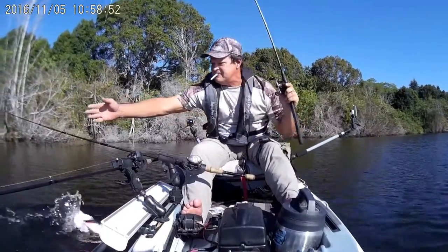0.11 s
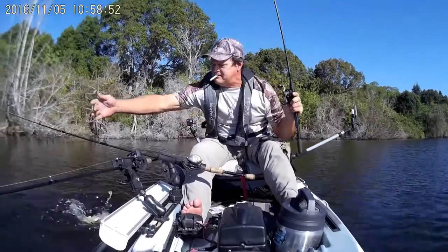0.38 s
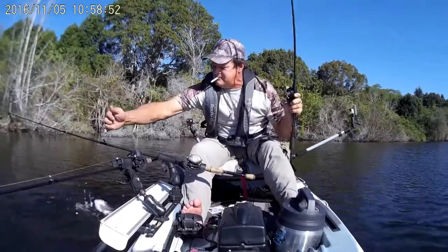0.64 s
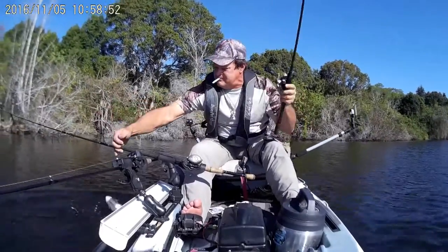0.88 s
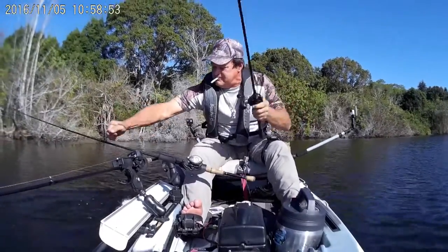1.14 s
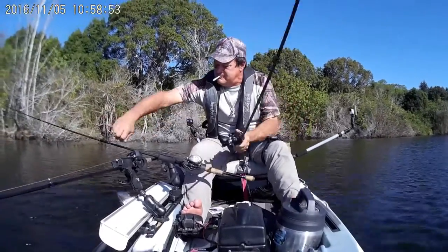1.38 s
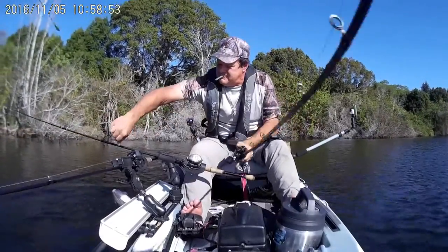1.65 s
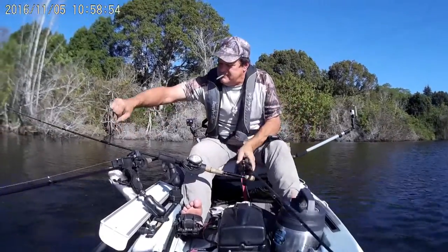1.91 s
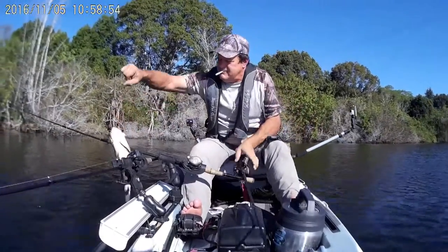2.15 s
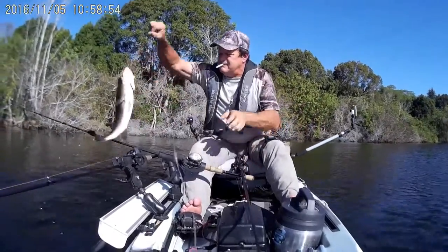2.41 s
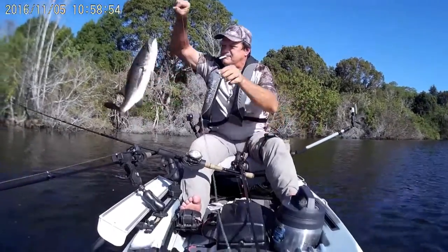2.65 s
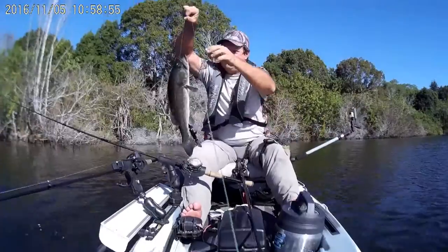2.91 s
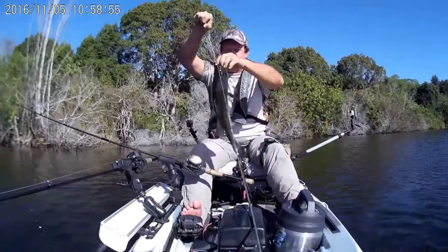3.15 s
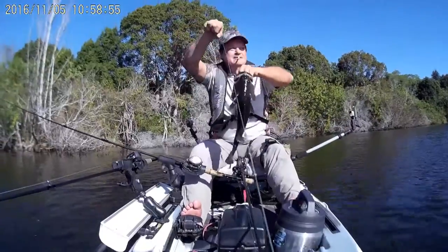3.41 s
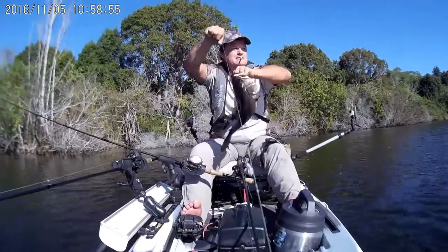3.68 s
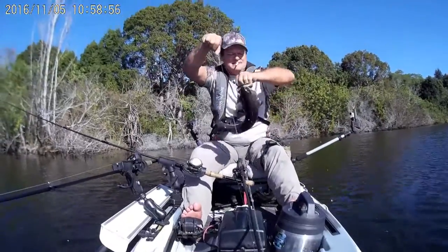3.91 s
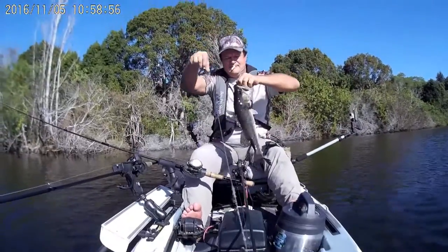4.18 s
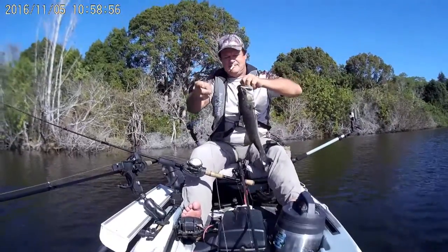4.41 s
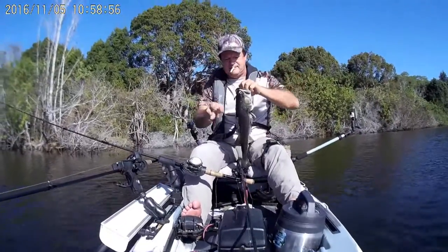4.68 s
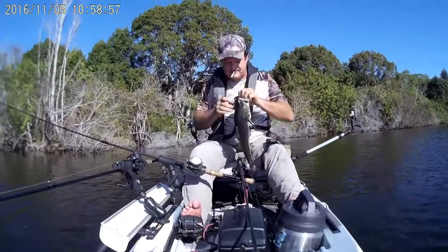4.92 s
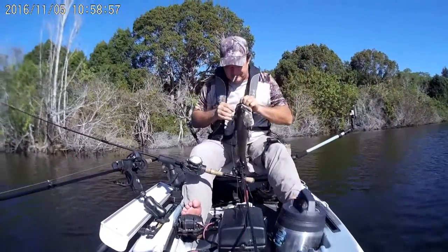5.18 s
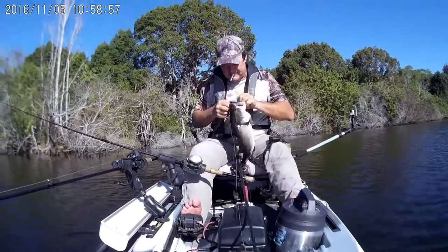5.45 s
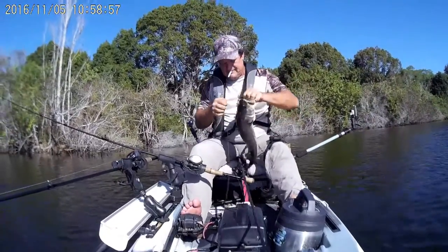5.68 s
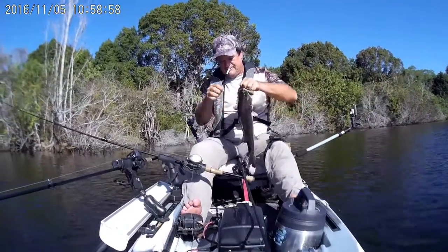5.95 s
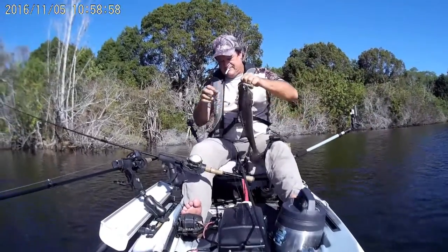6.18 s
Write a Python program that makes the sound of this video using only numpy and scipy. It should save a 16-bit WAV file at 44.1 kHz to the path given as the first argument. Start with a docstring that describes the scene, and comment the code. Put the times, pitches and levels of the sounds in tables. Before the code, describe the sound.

A quiet open-water scene carried mostly through a boat's plastic hull. Sparse drips tick over steady low hiss, then a wet fish slaps and knocks the deck in an irregular flurry lasting just over a second, with booming thumps and rubbing. Splashing is only thin, high fizz. Lighter scuffs and occasional taps follow, then a brief, sharper flurry near the end, dying back to hiss.

```python
"""A fish is swung aboard a plastic kayak and thrashes; the microphone sits in a sealed case fixed to the hull.
0-2 s: preamplifier hiss, a faint whine and hull hum, with sparse droplets, thin spray and light deck taps.
2-3.3 s: first thrash. Knocks ring deck, wall and case as decaying sines, thumps boom, slips rub the hull.
3.3-5.5 s: weaker rubbing, stray knocks and droplets. 5.6-6 s: second thrash, then hum and hiss remain.
Knocks and rubbing arrive through the plastic; splashing at the side is only faint, high filtered noise."""
import sys
import numpy as np
from scipy import signal
from scipy.io import wavfile
from scipy.ndimage import uniform_filter1d

SR = 44100
rng = np.random.default_rng(int(sys.argv[2]) if len(sys.argv) > 2 else 0)


def ratio_of_db(decibels):
    """Turn decibels (scalar or array-like) into linear amplitude factors; 0 dB maps to 1."""
    return 10 ** (np.asarray(decibels, float) / 20)


def dump(signal):
    """Clip the signal to [-1, 1] and save it as 16-bit WAV at the path in sys.argv[1]."""
    limited = np.clip(np.atleast_2d(signal).T, -1, 1)
    pcm = np.round(limited * 32767).astype(np.int16)
    wavfile.write(sys.argv[1], SR, pcm)


N = 278712  # samples


def evened(x):
    """Scales to rms 1."""
    return x / np.sqrt(np.mean(x ** 2) + 1e-20)


def peaked(x):
    """Scales to peak 1."""
    return x / abs(x).max()


def coloured(x, points):
    """Filters to a tabled spectrum at minimum phase: nothing sounds ahead of its cause."""
    f, db = np.transpose(points)
    hz = abs(np.fft.fftfreq(4096, 1 / SR))
    gain_db = np.interp(np.log(hz + 1), np.log(f + 1), db)
    spectrum = np.exp(np.conj(signal.hilbert(np.log(ratio_of_db(gain_db)))))
    taps = np.fft.ifft(spectrum).real[:2048]
    return signal.oaconvolve(x, taps)[:len(x)]


def ring(modes, seconds, near_hz=None, db_per_octave=0):
    """Tap response of one part: dying sines that swell over their first cycles, favouring near_hz if given."""
    t = np.arange(round(seconds * SR)) / SR
    out = np.zeros(len(t))
    for hz, db, t60_s in modes:
        away_db = db_per_octave * abs(np.log2(hz / (near_hz or hz)))
        decay_db = 60 * t / max(t60_s, 0.004)
        swell = 1 - np.exp(-(t * hz / 0.99) ** 2)
        out += ratio_of_db(db - away_db - decay_db) * swell * np.sin(2 * np.pi * hz * t)
    return out


def blow(contact_s, impact=0.4):
    """Force of one blow: a first impact, then the soft body chatters while it stays in contact."""
    t = np.arange(2048) / SR
    force = rng.standard_normal(2048) * np.exp(-t / contact_s)
    force[0] = impact * np.linalg.norm(force)
    return force


def add(mix, s, db, force, body):
    """Adds a force played through a body at the given peak level."""
    sound = signal.fftconvolve(force, body)
    part = mix[round(s * SR):][:len(sound)]
    part += ratio_of_db(db) * peaked(sound)[:len(part)]


def stirred(force, body):
    """Steady force through a body of unit energy, which keeps the power of a white force."""
    return signal.oaconvolve(force, body / np.linalg.norm(body))[:N]


def grains(per_s, spread_db):
    """Random clicks, a few of them large."""
    hits = rng.random(N) < per_s / SR
    size_db = spread_db * np.minimum(rng.exponential(1, N), 4)
    return rng.standard_normal(N) * hits * ratio_of_db(size_db)


def strokes(rows, trail_db, edge_s):
    """Gain of strokes that change by trail_db from start to end, edges smoothed by a one-pole filter."""
    t = np.arange(N) / SR
    gain = np.zeros(N)
    for start_s, end_s, db in rows:
        level_db = np.interp(t, [start_s, end_s], [db, db + trail_db])
        gain += ratio_of_db(level_db) * (t > start_s) * (t < end_s)
    keep = np.exp(-1 / (edge_s * SR))
    return signal.lfilter([1 - keep], [1, -keep], gain)


# Preamplifier noise spectrum: (frequency [Hz], relative density [dB per Hz])
HISS_COLOUR = [(12, -34), (20, -4), (132, -2.5), (165, -4.5), (218, -6.5), (460, -9.5), (544, -12.5),
               (802, -14), (1090, -15.5), (1440, -18), (2180, -21), (15200, -23)]
HISS_RMS_DB = -69


def preamplifier_hiss():
    """Steady noise of the preamplifier, falling toward the treble."""
    return ratio_of_db(HISS_RMS_DB) * evened(coloured(rng.standard_normal(N), HISS_COLOUR))


def electrical_whine():
    """Faint steady sine of electrical origin."""
    whine_hz, peak_db = 6820, -89.5
    return ratio_of_db(peak_db) * np.sin(2 * np.pi * whine_hz * np.arange(N) / SR)


# Hull boom modes: (frequency [Hz], relative level [dB], t60 [s])
BOOM_MODES = [(175.7, -5.5, 0.23), (198.9, 2, 0.096), (232.3, 2, .12), (261.4, -4.5, 0.14), (308, -7, 0.12)]
# Deep sway modes: (frequency [Hz], relative level [dB], t60 [s])
SWAY_MODES = [(42.3, -6.5, 0.68), (71.4, 1, 0.28), (110.7, -5, 0.35), (124, -9.5, 0.27)]
# Rocking and flexing of the boat: (time [s], hull hum level [dB])
ROCKING = [(0, -73.5), (1.0, -82.5), (1.15, -75), (1.28, -77), (1.4, -65.5), (1.6, -80.5), (2.0, -70),
           (2.41, -48), (2.96, -54), (3.25, -62.5), (3.7, -69.5), (4.1, -68.5), (4.35, -64), (4.7, -63.5),
           (5.1, -80), (5.55, -70.5), (5.75, -64), (5.84, -59), (5.95, -57), (6.07, -69), (6.32, -87)]
EVEN_DB, SWAY_DB_PER_HUM_DB = -73.5, 0.78  # sway equals hum at EVEN_DB


def rocking():
    """The moving boat keeps its low modes stirred; the deep sway follows part of the hum's level changes."""
    hum_db = np.interp(np.arange(N) / SR, *np.transpose(ROCKING))
    sway_db = EVEN_DB + SWAY_DB_PER_HUM_DB * (hum_db - EVEN_DB)
    hum = stirred(rng.standard_normal(N) * ratio_of_db(hum_db), ring(BOOM_MODES, 0.5))
    sway = stirred(rng.standard_normal(N) * ratio_of_db(sway_db), ring(SWAY_MODES, 1.0))
    return hum + sway


# Spray spectrum: (frequency [Hz], relative density [dB per Hz])
SPRAY_COLOUR = [(2200, -32), (3900, -1.5), (5300, -13), (7500, -2.5), (9400, -5.5), (12500, -3.5),
                (15200, -14.5)]
# Showers of spray: (start [s], end [s], start level [dB])
SHOWERS = [(.1, .2, -76), (.4, .66, -74), (1.05, 1.2, -77.5), (2.25, 2.28, -55.5), (2.33, 2.41, -63.5),
           (2.356, 2.37, -48), (2.426, 2.445, -47.5), (2.45, 2.62, -63.5), (2.63, 2.96, -67),
           (3.78, 3.95, -76.5), (4.39, 4.52, -67.5), (5.68, 5.7, -66), (5.703, 5.74, -57.5),
           (5.76, 5.8, -58), (5.835, 5.87, -61), (5.885, 5.975, -64.5)]


def spray():
    """Fine fizz in uneven patches of pitch, thickened by millisecond clumps of droplets."""
    puff = np.exp(-np.arange(1500) / (0.0015 * SR))
    droplets = abs(grains(200, spread_db=4.5))
    clumps = 1.23 + evened(signal.oaconvolve(droplets, puff)[:N])
    noise = coloured(rng.standard_normal(N + 512), SPRAY_COLOUR)
    z = signal.stft(noise, nperseg=256)[2]
    patches = uniform_filter1d(rng.standard_normal(z.shape), size=8, axis=0)  # over frequency
    patches = evened(uniform_filter1d(patches, size=10, axis=1))  # over time
    fizz = evened(signal.istft(z * ratio_of_db(1.2 * patches), nperseg=256)[1][:N])
    return evened(clumps * fizz) * strokes(SHOWERS, trail_db=-5, edge_s=0.003)


# Case modes: (frequency [Hz], relative level [dB], t60 [s], at least 0.004 when rung)
CASE_MODES = [(2500, -41, .02), (3225, 14.5, 0.0033), (3828, 1, 0.016), (5320, -14, 0.023),
              (5730, -3, 0.0057)]
# Single droplets: (time [s], puff peak [dB], case ring peak [dB])
DROPLETS = [(0.1416, -50, -75), (0.168, -53, -67.5), (0.2588, -56, -73.5), (0.4394, -55, -72),
            (0.4733, -51.5, -69), (0.5048, -50, -64.5), (0.5801, -49, -70), (0.6094, -54, -75),
            (0.9956, -57, -84), (1.0645, -50, -70), (1.3748, -54, -71), (1.4167, -52, -68),
            (2.2074, -52, -70), (2.3954, -40, -60), (3.052, -51, -67), (3.093, -51, -73), (3.757, -46, -61),
            (5.295, -51, -89), (5.3027, -49.5, -90), (5.32, -57, -89), (5.576, -50.5, -66.5),
            (5.701, -42, -58), (5.7581, -31, -46), (6.032, -50, -86)]


def drops():
    """Each droplet is a thin high puff that also touches the ring of the case."""
    out = np.zeros(N)
    thin = signal.firwin(65, 8500, pass_zero=False, fs=SR)
    case = ring(CASE_MODES, 0.1, near_hz=3900, db_per_octave=80)
    for s, puff_db, case_db in DROPLETS:
        add(out, s, puff_db, blow(0.0038), thin)
        add(out, s, case_db, blow(0.0083), case)
    return out


# Deck modes: (frequency [Hz], relative level [dB], t60 [s])
DECK_MODES = [(1117, 13.5, 0.038), (1183, -4.5, 0.067), (1208, 16.5, 0.023), (1273, 8.5, 0.042),
              (1260, -15.5, 0.01)]
# Drips and light taps: (time [s], peak [dB], favoured frequency [Hz])
DRIPS = [(0.331, -59, 1180), (0.6236, -61, 1360), (0.924, -66, 1410), (1.458, -61, 1390),
         (1.682, -59, 1330), (4.483, -38, 1070), (5.568, -62, 1100)]


def drips():
    """A drop of water or a piece of tackle taps the deck softly, favouring modes near its pitch."""
    out = np.zeros(N)
    for s, db, hz in DRIPS:
        add(out, s, db, blow(0.0072), ring(DECK_MODES, 0.2, hz, db_per_octave=71))
    return out


# Deck overtones: (frequency [Hz], relative level [dB], t60 [s])
OVERTONE_MODES = [(1514, 9.5, 0.016), (1620, -22, 0.015), (1724, 16.5, 0.011), (1833, 4, 0.041)]
# Side wall modes: (frequency [Hz], relative level [dB], t60 [s])
WALL_MODES = [(391, -2.5, 0.086), (449.2, 9.5, 0.044), (506, 5, 0.054), (552, -10.5, 0.19),
              (632.4, 4, 0.061), (787.4, -3.5, 0.11), (811, -5.5, 0.13)]
# Things dragging over the hull: (start [s], end [s], start level [dB])
RUBS = [(1.3, 1.5, -75), (2.06, 2.13, -58), (2.27, 2.41, -45.5), (2.42, 2.62, -46), (2.64, 2.91, -48.5),
        (2.95, 3.05, -66), (3.09, 3.23, -59.5), (3.33, 3.56, -59.5), (3.6, 3.7, -64.5), (3.85, 3.92, -62.5),
        (4.01, 4.06, -62.5), (4.15, 4.25, -58.5), (4.27, 4.47, -62.5), (4.5, 4.6, -66.5), (5.64, 5.8, -52),
        (5.87, 6.02, -58.5)]


def rubbing():
    """Small random slips excite deck, overtones, walls and case."""
    slips = evened(grains(2500, spread_db=2.5)) * strokes(RUBS, trail_db=-8.5, edge_s=0.0066)
    body = ring(DECK_MODES, 0.2) + ratio_of_db(-7.5) * ring(OVERTONE_MODES, 0.2)
    body += ratio_of_db(8.5) * ring(WALL_MODES, 0.2) + ratio_of_db(-0.5) * ring(CASE_MODES, 0.2)
    return stirred(slips, body)


# Weight landing on the hull: (time [s], boom peak [dB], favoured frequency [Hz])
THUMPS = [(1.354, -55.5, 207), (1.937, -50.5, 169), (2.061, -34, 195), (2.098, -39.5, 206),
          (2.245, -26.5, 256), (2.299, -34, 242), (2.35, -34, 177), (2.41, -38.5, 248), (2.477, -28, 204),
          (2.63, -18, 208), (2.656, -31, 200), (2.69, -34.5, 185), (2.791, -38, 221), (2.875, -42, 257),
          (2.958, -40, 260), (3.072, -34.5, 264), (3.232, -49.5, 233), (4.17, -51.5, 181),
          (4.484, -41, 243), (4.518, -45.5, 263), (4.624, -49.5, 218), (4.68, -52, 231),
          (4.765, -48.5, 231), (5.637, -31, 188), (5.658, -36.5, 224), (5.687, -41.5, 237),
          (5.731, -34.5, 188), (5.766, -30.5, 208), (5.783, -50, 256), (5.898, -38.5, 200),
          (5.962, -42, 222)]
SWAY_DB, MIDDLE_HZ, SWAY_DB_PER_OCTAVE = -12.5, 211, -12  # SWAY_DB: relative to boom, at MIDDLE_HZ


def thumps():
    """A softer, longer push sets the hull booming; the deeper the thump, the more it sways the boat."""
    out, sway = np.zeros(N), ring(SWAY_MODES, 0.8)
    for s, db, hz in THUMPS:
        boom = ring(BOOM_MODES, 0.5, hz, db_per_octave=33)
        sway_db = db + SWAY_DB + SWAY_DB_PER_OCTAVE * np.log2(hz / MIDDLE_HZ)
        add(out, s, db, blow(0.0071, impact=0.79), boom)
        add(out, s, sway_db, blow(0.0027, impact=0.5), sway)
    return out


# Bare tick spectrum: (frequency [Hz], relative density [dB per Hz])
TICK_COLOUR = [(1180, -35), (2000, -27), (4020, -15), (7320, -10.5), (7920, -12.5), (11200, -7),
               (14700, -10), (15600, -10), (16500, -19.5)]
# Knocks of fish and tackle, peak of each part ahead of the mount:
# (time [s], deck [dB], side wall [dB], case [dB], bare tick [dB])
KNOCKS = [(1.937, -46.5, -63, -39.5, -34), (2.052, -48, -55, -43.5, -28.5), (2.0894, -53, -66, -44, -43.5),
          (2.1769, -55, -55.5, -71, -73), (2.2468, -24, -33, -35, -27), (2.263, -30.5, -41, -48, -62),
          (2.2894, -37.5, -51, -46, -70), (2.3044, -50, -59, -52, -43.5),
          (2.3257, -22.5, -42.5, -42, -30.5), (2.3372, -36, -35.5, -42, -36.5), (2.354, -37, -32, -59, -53),
          (2.3748, -41.5, -52, -52, -44), (2.439, -39.5, -41, -51, -41), (2.476, -21, -30.5, -24.5, -33),
          (2.523, -41.5, -42, -56, -56), (2.6288, -28, -28, -29.5, -41.5),
          (2.6548, -31.5, -32.5, -36, -64.5), (2.6738, -34, -36, -49, -51), (2.7807, -46, -39, -52.5, -51),
          (2.8688, -58, -37.5, -56, -66), (2.95, -55, -38.5, -64, -73), (3.0059, -68, -42, -72, -67),
          (3.076, -42, -32.5, -60, -58), (3.2159, -74, -49, -72, -57), (4.2597, -41.5, -46, -50.5, -42),
          (4.4762, -38.5, -47, -53, -41), (4.6218, -52, -55.5, -74, -76), (4.7013, -58, -61, -80, -77),
          (4.7506, -59, -64, -76, -73), (4.779, -54.5, -58.5, -78, -61), (5.6271, -35.5, -42, -37, -31.5),
          (5.6778, -51, -66, -58, -45.5), (5.7206, -35, -51, -58, -32.5), (5.7606, -23.5, -33, -47, -29.5),
          (5.7756, -29.5, -36.5, -45.5, -40), (5.834, -34, -60.5, -50.5, -39), (5.8441, -37, -61, -58, -59),
          (5.8532, -35.5, -52, -56, -55), (5.861, -44, -64, -53, -60), (5.886, -39, -42.5, -62, -49),
          (5.9032, -32.5, -43, -68, -68), (5.9136, -42, -66, -67, -60), (5.9336, -38.5, -54, -56, -59),
          (5.9596, -39.5, -46, -52.5, -60)]
# Overtones: level re deck [dB], loss near the wall [dB per dB], gain with sharpness [dB per dB]
OVERTONE_DB, DULL_NEAR_WALL, BRIGHT_WHEN_SHARP = -12.5, 0.46, 0.18


def knocks():
    """Every blow sets off each part of the boat by its own amount."""
    out = np.zeros(N)
    tick = coloured(signal.unit_impulse(1024), TICK_COLOUR)
    # (response, contact [s], share of the first impact)
    parts = [(ring(DECK_MODES, 0.2), 0.005, 0.4), (ring(OVERTONE_MODES, 0.2), 0.004, 0.4),
             (ring(WALL_MODES, 0.3), 0.0045, 1.3), (ring(CASE_MODES, 0.1), 0.002, 0.4), (tick, 0.002, 0.3)]
    for s, deck_db, wall_db, case_db, tick_db in KNOCKS:
        sharp_db = max(case_db, tick_db) - deck_db
        near_wall_db = wall_db - deck_db
        over_db = deck_db + OVERTONE_DB - DULL_NEAR_WALL * near_wall_db + BRIGHT_WHEN_SHARP * sharp_db
        levels_db = (deck_db, over_db, wall_db, case_db, tick_db)
        for db, (body, contact_s, impact) in zip(levels_db, parts):
            add(out, s, db, blow(contact_s, impact), body)
    return out


# The mount passes little here: (frequency [Hz], width [Hz])
MOUNT_DIPS = [(143, 28), (320, 13), (945, 105), (2130, 68)]


def scene():
    """Sums all that reaches the microphone and notches it as the mount does."""
    mix = rocking() + spray() + drops() + drips() + rubbing() + thumps() + knocks()
    for hz, width_hz in MOUNT_DIPS:
        mix = signal.lfilter(*signal.iirnotch(hz, hz / width_hz, SR), mix)
    return mix[None]


def roll_off(x):
    """The treble ends steeply here."""
    return signal.sosfilt(signal.butter(12, 16630, fs=SR, output="sos"), x)


def record(dry):
    """Adds preamplifier hiss and electrical whine, then limits the band steeply."""
    noisy = dry + preamplifier_hiss() + electrical_whine()
    band_limit = signal.butter(14, 15300, fs=SR, output="sos")
    mix = signal.sosfilt(band_limit, noisy)
    return roll_off(mix)


dry = scene()
out = record(dry)
dump(out)
```